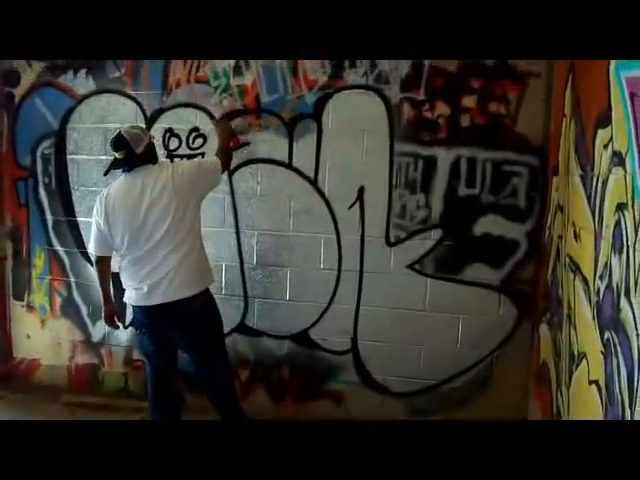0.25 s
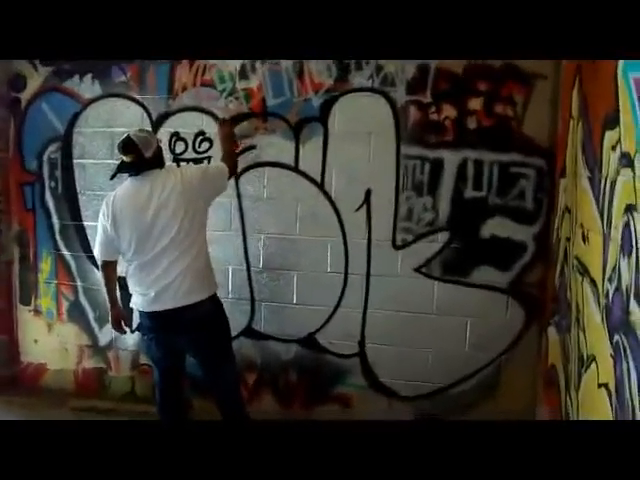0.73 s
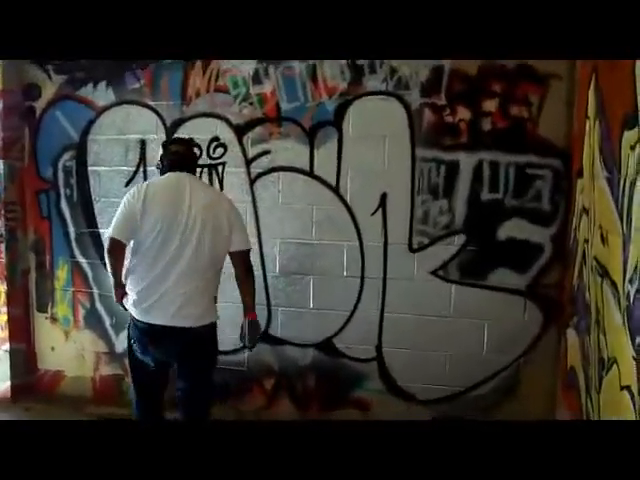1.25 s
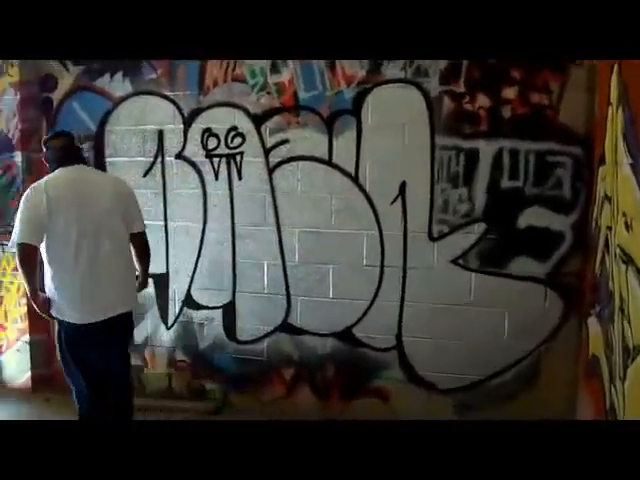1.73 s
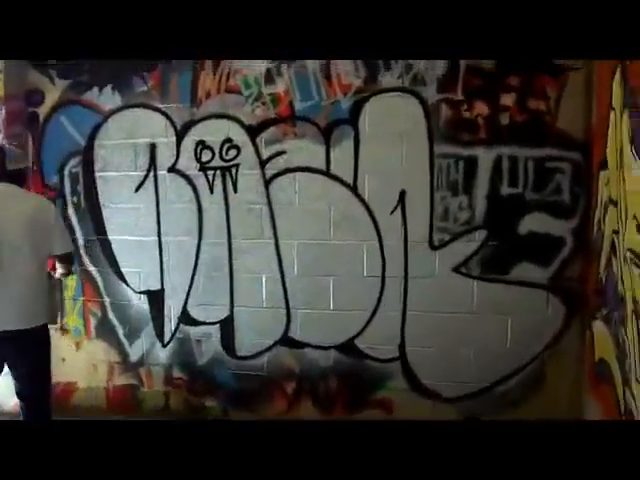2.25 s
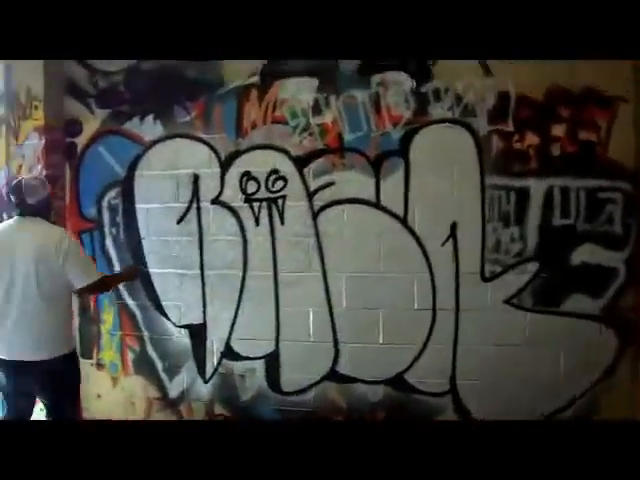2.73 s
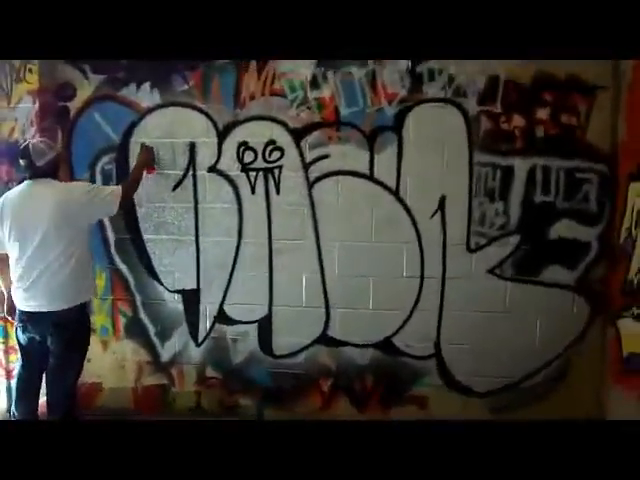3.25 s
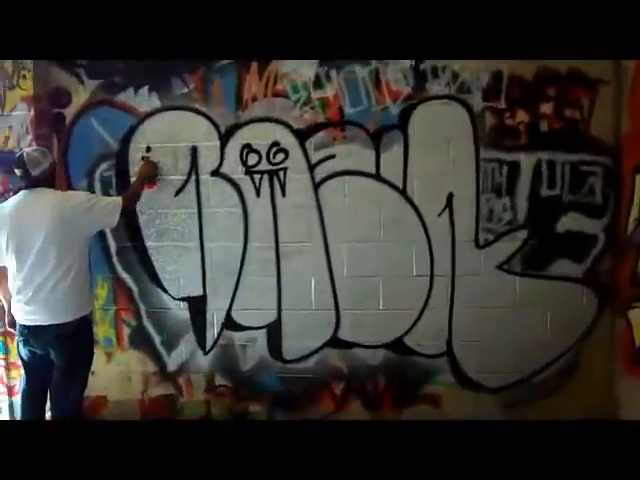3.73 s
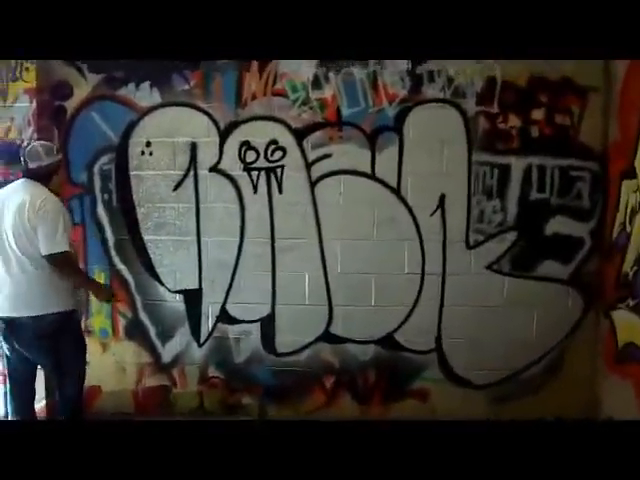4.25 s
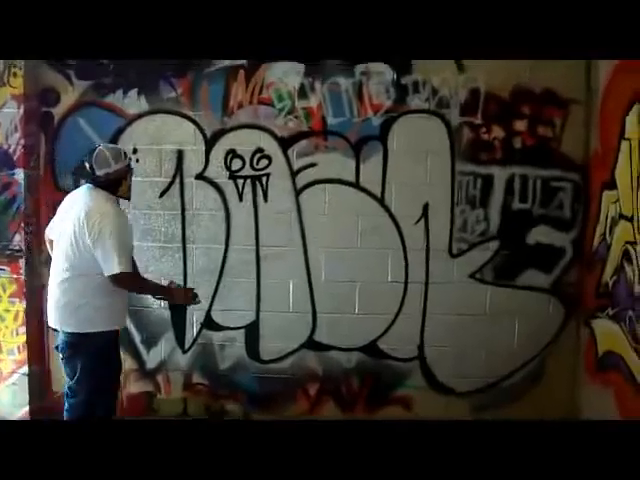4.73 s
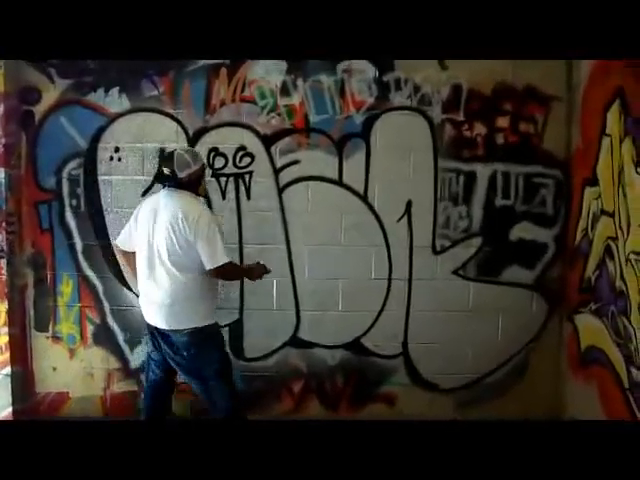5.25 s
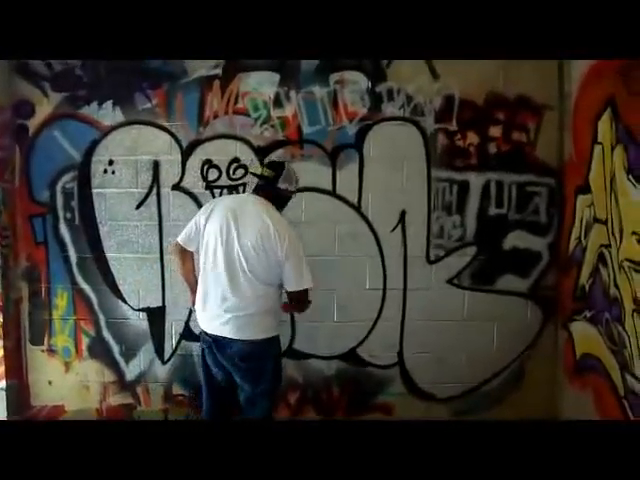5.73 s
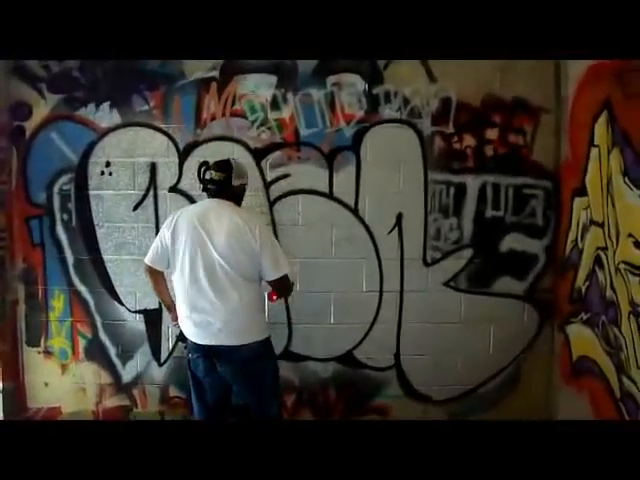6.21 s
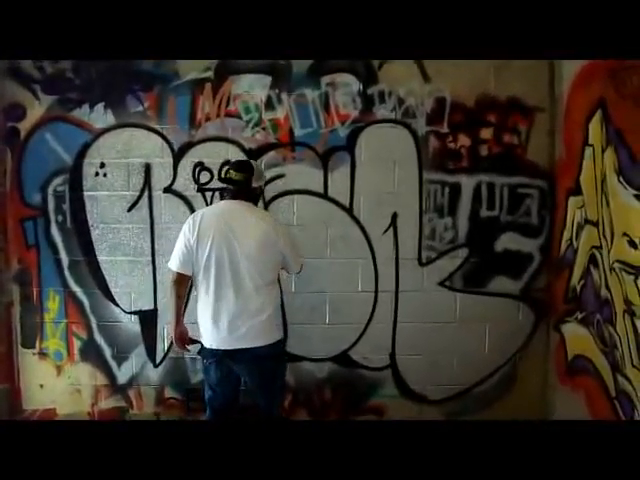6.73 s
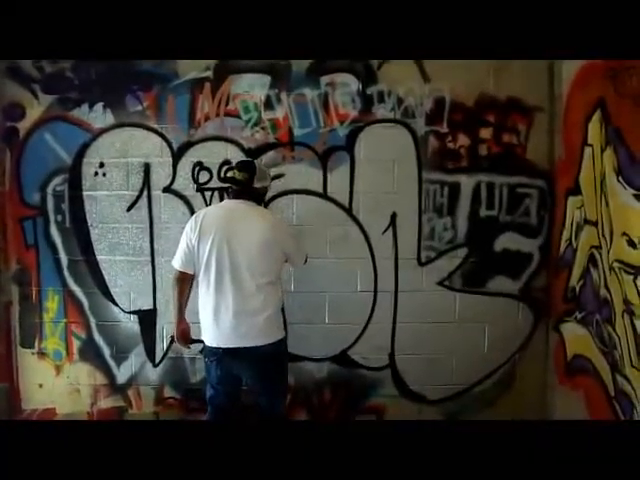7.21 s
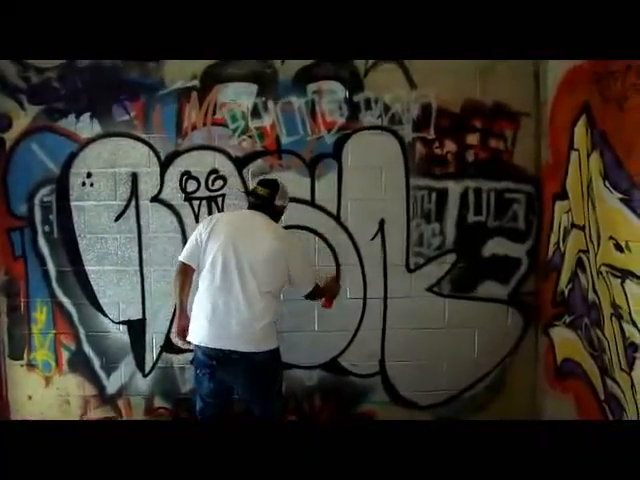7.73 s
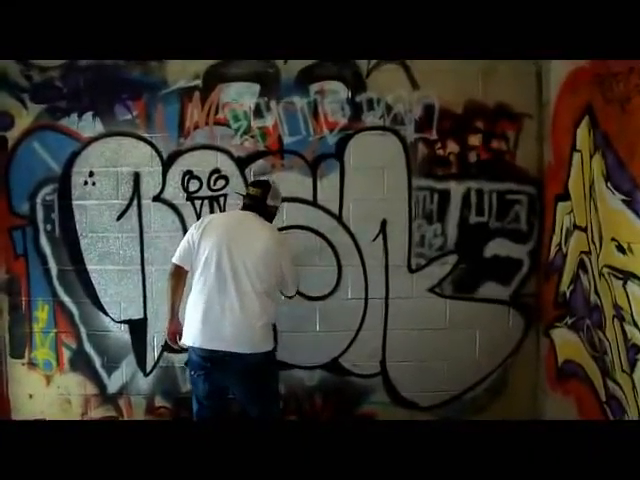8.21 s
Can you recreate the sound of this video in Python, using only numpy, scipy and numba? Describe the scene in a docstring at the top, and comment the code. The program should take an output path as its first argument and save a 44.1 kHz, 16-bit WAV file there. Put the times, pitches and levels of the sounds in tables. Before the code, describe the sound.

Brief, weak aerosol spurts open over low wind rumble and quiet air. Hard bright steel clicks burst out as the can is shaken, with hollow rolling between them, clothing rustle and muffled steps. A pause holds three tiny sprays; then the clatter returns busier and louder, fades, and gives way to one continuous faint spray. Slightly distant, dull-topped small-camera sound with bare-wall reverberation.

```python
"""In a bare concrete shelter, a spray can is carried and shaken a few metres from a small camera.
Faint spray hiss is shaped noise, switched by a valve. The mixing ball chatters and rolls: tiny impacts
and rubbing noise ring the steel wall and the hollow can, which also sings short notes.
Dull footfalls are puffs of noise. A low rustle, wind rumble and quiet air are noises of slowly varying level.
Bare walls answer the blows, notes and footfalls with a fading tail."""
import sys
import numpy as np
from scipy import signal
from scipy.fft import rfft, irfft
from scipy.io import wavfile
from scipy.ndimage import uniform_filter1d
from numba import njit

SR = 44100
rng = np.random.default_rng(int(sys.argv[2]) if len(sys.argv) > 2 else 0)


def to_wav(s):
    """Save 16-bit WAV."""
    ch = np.atleast_2d(s).T  # columns
    pcm = np.round(np.clip(ch, -1, 1) * 32767)  # PCM
    wavfile.write(sys.argv[1], SR, pcm.astype(np.int16))


N = 373527  # length in samples
LEAD = SR // 20  # samples in which an event may swell


def undb(db):
    """Turns decibels into a plain multiplier."""
    return 10 ** (np.asarray(db) / 20)


def unit(x):
    """Scales a sound to an rms of 1."""
    return x / np.sqrt(np.mean(x ** 2))


def curve(table, quiet=-120):
    """Joins (time_s, level_db) points into a level for every sample, quiet outside them."""
    time_s, level_db = np.transpose(table)
    return np.interp(np.arange(N) / SR, time_s, level_db, quiet, quiet)


def coloured(points):
    """Noise of rms 1 whose spectrum follows (pitch_hz, level_db) points."""
    pitch_hz, level_db = np.transpose(points)
    bins_hz = np.arange(1, N // 2 + 2) * SR / N
    gain = undb(np.interp(np.log(bins_hz), np.log(pitch_hz), level_db))
    return unit(irfft(rfft(rng.standard_normal(N)) * gain, N))


def walk(rate):
    """Slides between random levels, rate of them per second; their spread is near 1."""
    hold = int(SR / rate)
    levels = np.repeat(rng.standard_normal(N // hold + 1), hold)
    return 1.2 * uniform_filter1d(levels, hold)[:N]


@njit
def svf(x, hz, width):
    """Resonance with a gain of 1 at its centre, which may move every sample."""
    out, band_state, low_state = np.empty(len(x)), 0., 0.
    for i in range(len(x)):
        g, damping = np.tan(np.pi * hz[i] / SR), width / hz[i]
        v = (band_state + g * (x[i] - low_state)) / (1 + g * (g + damping))
        band_state = 2 * v - band_state
        low_state += 2 * g * v
        out[i] = damping * v
    return out


def band(x, hz, width):
    """The same resonance, held at one pitch."""
    return svf(x, hz * np.ones(N), float(width))


def envelope(swell, t60):
    """Swells for a moment up to sample LEAD, then falls 60 dB every t60 seconds."""
    t = np.arange(-LEAD, 5 * LEAD) / SR
    rise = np.clip(1 + t / max(swell, 1 / SR), 0, 1)
    return np.where(t < 0, rise, undb(-60 * t / max(t60, .005)))


def add(out, sound, s):
    """Mixes a sound in, with its sample LEAD at s seconds."""
    at = int(s * SR) - LEAD
    out[at:at + len(sound)] += sound[:N - at]


def bursts(table, swell, width):
    """Puffs of noise, each through a doubled resonance; width is a share of its centre."""
    puff_crest_db = 10.5  # peak over rms of a noise puff
    out = np.zeros(N)
    for s, db, hz, t60 in table:
        centre = np.full(6 * LEAD, 1. * hz)
        noise = svf(rng.standard_normal(6 * LEAD), centre, width * hz)
        noise = svf(noise, centre, 2 * width * hz)
        add(out, undb(db - puff_crest_db) * envelope(swell, t60) * unit(noise), s)
    return out


# times when the nozzle is pressed, with the level at first: start_s, end_s, level_db
SPRAY = [(0, 0.145, -61), (0.256, 0.368, -60.5), (.476, 0.58, -61.5), (0.637, 0.725, -61.5),
         (3.448, 3.494, -65), (3.558, 3.658, -60.5), (3.832, 3.9, -58), (7.328, 8.401, -61.5)]
# tone of the jet: pitch_hz, relative level_db (per Hz)
SPRAY_COLOUR = [(900, -17), (1700, 0.5), (2300, -0.5), (3000, -8.5), (5200, -2.5), (6300, -5), (7500, -1.5),
                (8600, -15)]
# the valve spits: peak_s, peak_db, centre_hz, t60_s (time to fall 60 dB)
SPITS = [(7.33, -46, 4300, 0.14), (8.36, -45.5, 4740, 0.18)]
BUILD_DB, BUILD_S = 2, .3  # a held nozzle grows this much stronger in this time
JET_SPLIT_HZ = 2500  # low and high parts of the jet waver on their own


def spray():
    """Gas and paint rush from the nozzle as unsteady noise; the valve opens and shuts in about 14 ms."""
    t = np.arange(N) / SR
    valve = np.zeros(N)
    for start, end, db in SPRAY:
        build_db = BUILD_DB * np.clip((t - start) / BUILD_S, 0, 1)
        valve += undb(db + build_db) * (t >= start) * (t < end)
    jet = coloured(SPRAY_COLOUR)
    low = signal.sosfiltfilt(signal.butter(2, JET_SPLIT_HZ, fs=SR, output="sos"), jet)
    high = jet - low
    jet = low * undb(2.2 * walk(20)) + high * undb(.8 * walk(30) + 1.2 * walk(5.5))
    return jet * uniform_filter1d(valve, size=600) + bursts(SPITS, swell=.015, width=0.27)


# clothes and feet as the painter moves, before a small waver: time_s, level_db
RUSTLE = [(0.0, -69.5), (1.67, -64.5), (2.57, -57), (3.87, -64), (5.73, -58), (7.24, -71.5), (8.47, -67)]
RUSTLE_HZ = 410


def rustle():
    """Clothes and feet rub softly: low noise that follows the painter's movement."""
    noise = unit(band(rng.standard_normal(N), RUSTLE_HZ, 450))
    return undb(curve(RUSTLE) + 1.3 * walk(6)) * noise


# tone of the quiet air: pitch_hz, relative level_db (per Hz)
AIR = [(59, -24), (100, 2.5), (278, -8.5), (317, -11.5), (618, -16), (863, -18.5), (1320, -18),
       (2630, -21.5), (7590, -27.5), (8490, -46.5), (11000, -53), (18700, -120)]
AIR_DB = -58  # level around which it wavers


def air():
    """A quiet floor of air noise, wavering slightly."""
    return undb(AIR_DB + .5 * walk(4.4)) * coloured(AIR)


# strength of the wind, before gusts: time_s, level_db
WIND = [(0, -45.5), (1.3, -47), (2.3, -45), (3.8, -47), (4.3, -43), (6.7, -44), (7.4, -51), (8.47, -48.5)]
# tone of the wind rumble: pitch_hz, relative level_db (per Hz)
WIND_COLOUR = [(5, -15.5), (16, 8), (35, -5.5), (70, -6), (130, -20.5), (300, -54)]
GUST_DB, GUSTS_PER_S = 2.2, 3.7  # spread of the gusts; random levels per second


def wind():
    """Wind rumbles on the microphone: deep noise that swells and sinks with the gusts."""
    return undb(curve(WIND, quiet=-50) + GUST_DB * walk(GUSTS_PER_S)) * coloured(WIND_COLOUR)


def contacts(gap_s, scatter_db, rub):
    """Tiny impacts at uneven gaps, plus rubbing noise; rub is its rms beside impacts of rms 1."""
    gaps, sizes = rng.standard_normal((2, N // 20))
    at = np.cumsum(gap_s * SR * np.exp(.4 * gaps)).astype(int)
    strengths = undb(scatter_db * sizes) * np.sign(gaps)
    inside = at < N
    ticks = np.zeros(N)
    ticks[at[inside]] = strengths[inside]
    return unit(ticks) + rub * rng.standard_normal(N)


# ringing of the steel wall, deadened by paint and the hand,
# before the detune, tilt and spread of each blow: pitch_hz, level_db
WALL = [(2700, -11), (3500, 2.5), (4250, 3.5), (5000, 2), (5700, -1.5), (6500, -8), (7300, -10.5),
        (8000, -25)]
WALL_T60_S = .003  # time for the ring to fall 60 dB


def wall_ring(bright_db=0, spot_db=0):
    """The steel wall's answer to one impact; where it lands changes each ringing pitch and its share."""
    hz, db = np.transpose(WALL)[:, :, None]
    share, detune = rng.standard_normal((2, len(WALL), 1))
    t = np.arange(SR // 100) / SR
    tilt_db = bright_db * np.log2(hz / 4500)
    gain = undb(db + spot_db * share + tilt_db - 60 * t / WALL_T60_S)
    # neighbours swing in opposite senses, so no holes open between them
    sense = (-1) ** np.arange(len(WALL))[:, None]
    ring = np.sum(sense * gain * np.sin(2 * np.pi * hz * (1 + .02 * detune) * t), axis=0)
    ring = signal.sosfilt(signal.butter(2, 1500, "high", fs=SR, output="sos"), ring)
    return ring / np.sqrt(np.sum(ring ** 2))


# resonances of the air and paint inside: pitch_hz, width_hz (of the first of two filters), level_db
HOLLOW = [(1350, 1680, -6.5), (1691, 350, 3), (2150, 390, -1.5)]


def hollow(x):
    """Air and paint ring at fixed pitches inside the can, which is too small to radiate bass."""
    ring = np.zeros(N)
    for k, (hz, width, db) in enumerate(HOLLOW):
        resonance = band(band(x, hz, width), hz, 2 * width)
        ring += (-1) ** k * undb(db) * resonance
    return signal.sosfilt(signal.butter(2, 780, "high", fs=SR, output="sos"), ring)


# how hard the can is swung, heard as ball rolling and paint sloshing: time_s, level_db
ROLL = [(1.0, -80), (1.34, -53), (1.6, -79), (1.78, -56), (1.9, -46.5), (2.2, -52.5), (2.75, -43.5),
        (3.05, -48.5), (3.25, -60), (3.55, -79), (4.0, -69.5), (4.25, -58), (4.37, -49.5), (4.72, -58),
        (4.9, -48.5), (5.5, -43), (5.86, -48.5), (6.2, -45), (6.48, -64), (6.56, -54), (6.68, -53.5),
        (6.78, -52.5), (7.0, -74)]
# centre of the hollow note when brisk; slow and quick wander as shares of it
ROLL_HZ, ROLL_DRIFT, ROLL_WOBBLE = 1930, 0.067, .042
SAG_HZ_PER_DB = 19.5  # a gentler swing gives a lower note
# note and ticks gain this many extra dB per dB of swing; a brisk swing sets the note level with the hollow
NOTE_GROWTH, BRISK_DB = .4, -48.5
# scrape and ticks against the note; unevenness of the whole level
SCRAPE_DB, TICKS_DB, SLOSH_DB = -9.5, -6.5, 1.5
SCRAPE_FLICKER_DB, NOTE_FLICKER_DB = 3.5, 3.5
# before a blow harder than HARD_DB the ball is in the air, and rolling dips
FLIGHT_S, FLIGHT_DIP_DB, HARD_DB = 0.041, -4.5, -25


def roll():
    """The rolling ball gives a wandering, stuttering hollow note, a gritty scrape and ticks on steel."""
    swing_db = curve(ROLL)
    flight = np.zeros(N)
    for s, db, *_ in BLOWS:
        flight[int((s - FLIGHT_S) * SR):int(s * SR)] += db > HARD_DB
    flight = uniform_filter1d(np.minimum(flight, 1), size=300)
    centre_hz = ROLL_HZ + SAG_HZ_PER_DB * np.clip(swing_db - BRISK_DB, -20, 5)
    hz = centre_hz * (1 + ROLL_DRIFT * walk(9) + ROLL_WOBBLE * walk(25))
    brisk = undb(NOTE_GROWTH * (swing_db - BRISK_DB))

    grit = contacts(gap_s=.0012, scatter_db=3.5, rub=0.94)
    moving = svf(svf(grit, hz, 300.0), hz, 640.0)
    moving = unit(moving * undb(NOTE_FLICKER_DB * walk(50)))
    note = brisk * moving + unit(hollow(grit))

    rough = grit * undb(SCRAPE_FLICKER_DB * walk(35))
    scrape = unit(signal.fftconvolve(rough, wall_ring())[:N])
    stray = contacts(gap_s=.007, scatter_db=2.5, rub=.1)
    ticks = unit(signal.fftconvolve(stray, wall_ring())[:N])

    rolling = undb(swing_db + SLOSH_DB * walk(12) + FLIGHT_DIP_DB * flight)
    return rolling * (note + undb(SCRAPE_DB) * scrape + undb(TICKS_DB) * brisk * ticks)


# blows of the ball, as nominal settings:
# peak_s, peak_db, hollow_share_db (against the blow), t60_s (chatter falls 60 dB)
BLOWS = [(1.0076, -37.5, -9, 0.053), (1.1757, -14.5, -8.5, 0.026), (1.2401, -17.5, -19, 0.041),
         (1.2715, -31, -4.5, .058), (1.3018, -27.5, -27, .073), (1.367, -30.5, -13, 0.058),
         (1.3904, -31.5, -8, 0.042), (1.4563, -37.5, -5.5, 0.048), (1.478, -38.5, -10, 0.16),
         (1.551, -33, -11, 0.073), (1.7632, -39.5, -8, 0.079), (1.7993, -27.5, -13, 0.17),
         (1.837, -16, -27.5, 0.086), (1.9057, -33, -20, 0.11), (1.954, -34.5, -6, .055),
         (2.051, -37.5, 4, 0.16), (2.072, -23.5, -21, 0.23), (2.1047, -25.5, -12, 0.11),
         (2.1971, -27, 7, 0.028), (2.248, -29, -1.5, 0.054), (2.294, -34, -2.5, 0.12),
         (2.3317, -8, -22.5, 0.044), (2.407, -38.5, 7, 0.069), (2.4577, -28, 1, 0.037),
         (2.5267, -38.5, 3.5, .049), (2.566, -20.5, -13, 0.078), (2.613, -27.5, -3, 0.11),
         (2.677, -32, -4.5, .19), (2.787, -25, -15.5, 0.26), (2.844, -36, 0, 0.1),
         (2.8953, -29.5, -6, 0.15), (2.9704, -37.5, 3.5, 0.03), (3.0093, -29, -14, 0.11),
         (3.1109, -23.5, -5.5, 0.027), (3.149, -24.5, -4.5, 0.053), (3.221, -49, 10.5, .066),
         (3.259, -34, -5, .089), (3.3039, -39.5, -5, 0.29), (3.375, -42, -5, 0.07),
         (4.1633, -38, 2.5, 0.09), (4.188, -13, -24.5, 0.061), (4.2067, -21.5, -7, 0.062),
         (4.328, -41, 2.5, 0.083), (4.3774, -27.5, -11.5, 0.14), (4.386, -24.5, -12.5, 0.2),
         (4.407, -18, -22, 0.074), (4.471, -25.5, -6.5, 0.07), (4.6564, -21, -9.5, 0.066),
         (4.6734, -22, -12.5, 0.094), (4.699, -33.5, -3, 0.042), (4.7498, -23.5, -3.5, .074),
         (4.7988, -35, 3.5, 0.058), (4.839, -18, -20, 0.058), (4.8439, -16, -5, 0.031),
         (4.849, -11.5, -35.5, 0.045), (4.9044, -39.5, 6.5, 0.037), (4.9588, -36.5, 3, 0.052),
         (4.988, -38, 3.5, 0.14), (5.034, -38, 5, .04), (5.0563, -12.5, -17, 0.03),
         (5.066, -11.5, -19.5, .061), (5.126, -20.5, -24, .08), (5.2218, -25.5, -1.5, 0.045),
         (5.313, -20, -11.5, 0.09), (5.348, -18.5, -16, 0.072), (5.433, -46.5, 9, 0.28),
         (5.47, -33, -1, .06), (5.484, -12.5, -22, 0.12), (5.617, -21.5, -3, .056),
         (5.635, -27.5, -11, 0.027), (5.7, -17, -16, 0.11), (5.774, -26.5, -14, 0.12),
         (5.808, -31.5, -26, 0.043), (5.877, -28, -3, 0.043), (5.9, -27.5, -6, 0.044),
         (5.9379, -42.5, 7, 0.064), (6.0048, -9, -20.5, 0.028), (6.017, -12.5, -15.5, 0.031),
         (6.067, -26, -17, 0.096), (6.1434, -30, 0.5, 0.16), (6.1957, -23, -14, 0.076),
         (6.2042, -15, -23, .1), (6.2936, -27.5, 1, 0.038), (6.407, -50.5, 9, 0.11),
         (6.5266, -39.5, 2.5, 0.14), (6.586, -41.5, -5, 0.19), (6.7204, -37.5, -1.5, 0.083),
         (6.789, -44, -6, 0.038), (6.837, -44.5, -2, 0.071)]
BRIGHT_DB_PER_OCT, BRIGHT_SCATTER_DB = 3.5, 1.5  # tilt of the wall ring, and its spread between blows
SPOT_DB = 1.5  # spread of each wall pitch's level with the spot struck
STEEL_CREST_DB, HOLLOW_GAIN_DB = 8, 8.5  # peak over rms of the chatter; gain of the hollow


def blows():
    """Each blow is a chatter of quick rebounds that rings the steel wall and the hollow can."""
    steel, push = np.zeros((2, N))
    chatter = contacts(gap_s=.0016, scatter_db=1, rub=0.49)
    for s, db, hollow_db, t60 in BLOWS:
        own = chatter[int(s * SR):][:6 * LEAD]
        ring = wall_ring(BRIGHT_DB_PER_OCT + BRIGHT_SCATTER_DB * rng.standard_normal(), SPOT_DB)
        rebounds = undb(db) * own * envelope(0.0041, t60)
        add(steel, signal.fftconvolve(rebounds, ring), s)
        # the hollow is driven for longer than the wall
        add(push, undb(db + hollow_db) * own * envelope(0.0019, 1.41 * t60), s)
    return undb(-STEEL_CREST_DB) * steel + undb(HOLLOW_GAIN_DB) * hollow(push)


# the hollow can sings briefly: peak_s, peak_db (nominal), pitch_hz, t60_s (time to fall 60 dB)
NOTES = [(1.768, -32, 1730, 0.083), (2.052, -24, 1880, 0.13), (2.855, -26, 1780, 0.27),
         (4.37, -27.5, 1760, 0.37), (4.99, -27.5, 2230, 0.16), (6.09, -33, 1860, .15),
         (4.48, -27.5, 1840, 0.31)]


def notes():
    """The rolling ball excites one narrow resonance of the can, made here from filtered noise."""
    return bursts(NOTES, swell=0.014, width=0.071)


# footfalls: peak_s, peak_db (nominal), centre_hz, t60_s (time to fall 60 dB)
STEPS = [(2.30, -31.5, 324, .3), (2.63, -32, 500, .27), (2.88, -39, 278, .3), (3.06, -38.5, 300, 0.19),
         (3.87, -36.5, 377, 0.1), (4.20, -42, 606, .1), (4.75, -43, 700, .16), (4.832, -31, 770, .2),
         (5.48, -38.5, 600, .15), (5.62, -38.5, 553, .17), (5.88, -36, 670, .15)]


def steps():
    """Dull footfalls on concrete, each a broad puff of low noise."""
    return bursts(STEPS, swell=0.013, width=1.4)


ROOM_T60_S, ROOM_DB = 0.54, -10  # time for the dull tail to fall 60 dB; level of the whole tail


def room(x):
    """Bare walls return a dense, fading tail that loses treble sooner."""
    t = np.arange(int(.6 * SR)) / SR
    tail = rng.standard_normal((2, len(t))) * np.clip(t / 0.019, 0, 1)
    dull = signal.lfilter([.3], [1, -.7], tail[0]) * undb(-60 * t / ROOM_T60_S)
    bright = 1.37 * tail[1] * undb(-60 * t / (0.27 * ROOM_T60_S))
    both = dull + bright
    return undb(ROOM_DB) * signal.fftconvolve(x, both / np.sqrt(np.sum(both ** 2)))[:N]


def scene():
    """Mixes all the sounds; only blows, notes and footfalls get the room's tail."""
    hits = blows() + notes() + steps()
    return (spray() + rustle() + air() + wind() + roll() + hits + room(hits))[None]


TOP_HZ = 8330  # highest pitch passed
OFFSET = .0396  # constant shift, as a share of full scale


def record(dry):
    """The camera cuts the top steeply and sits on a steady offset."""
    return signal.sosfilt(signal.ellip(8, .3, 62, TOP_HZ, fs=SR, output="sos"), dry) + OFFSET


dry = scene()
out = record(dry)
to_wav(out)
```